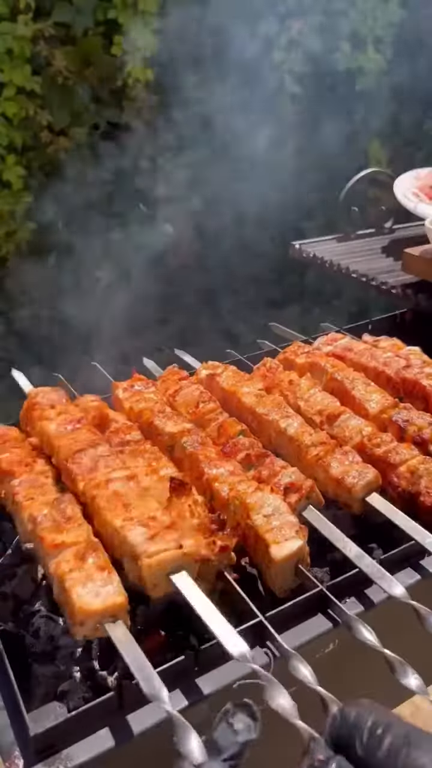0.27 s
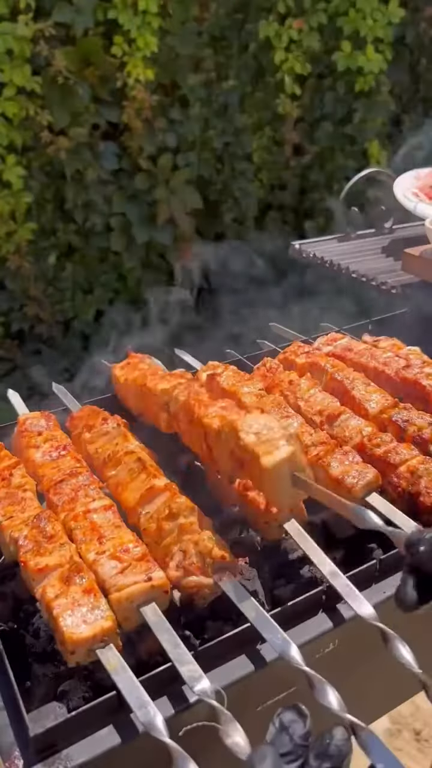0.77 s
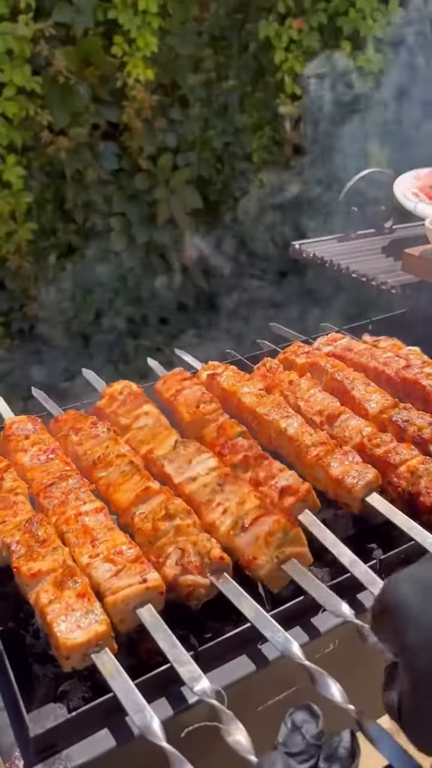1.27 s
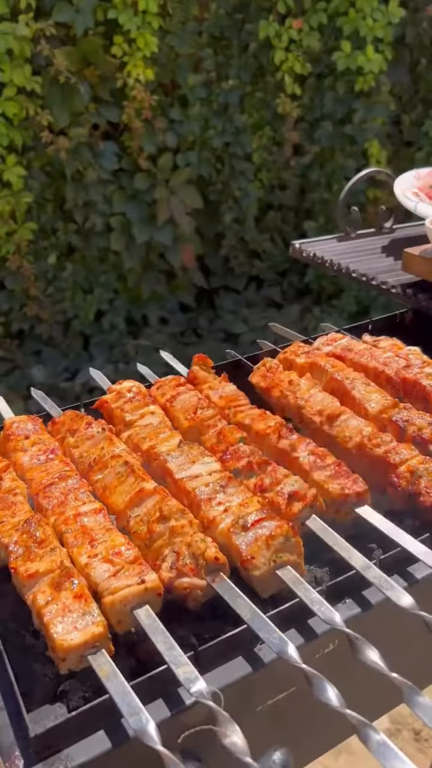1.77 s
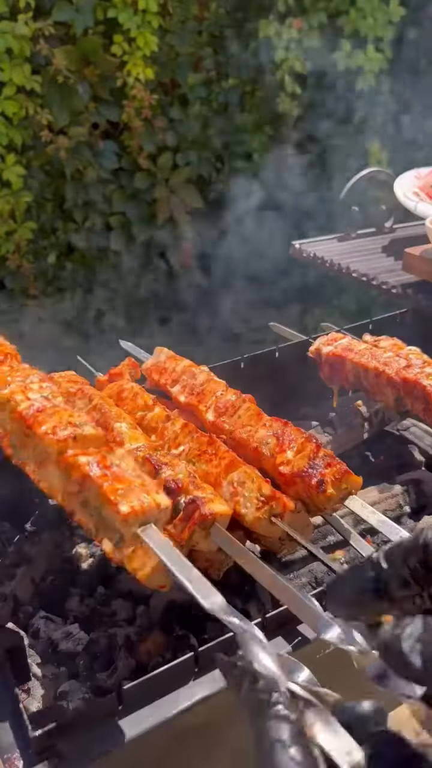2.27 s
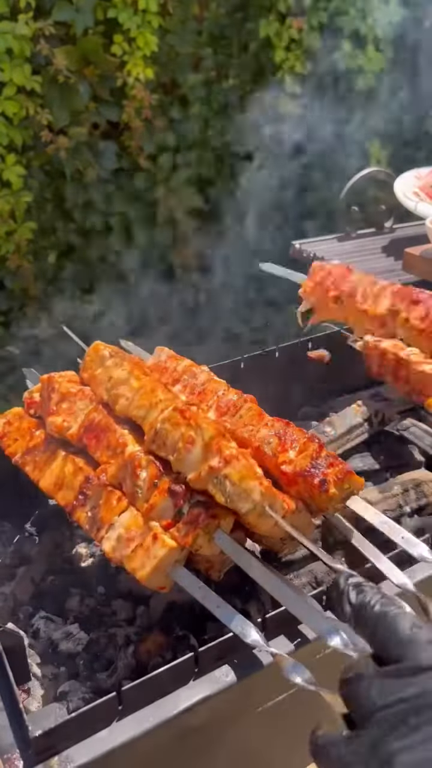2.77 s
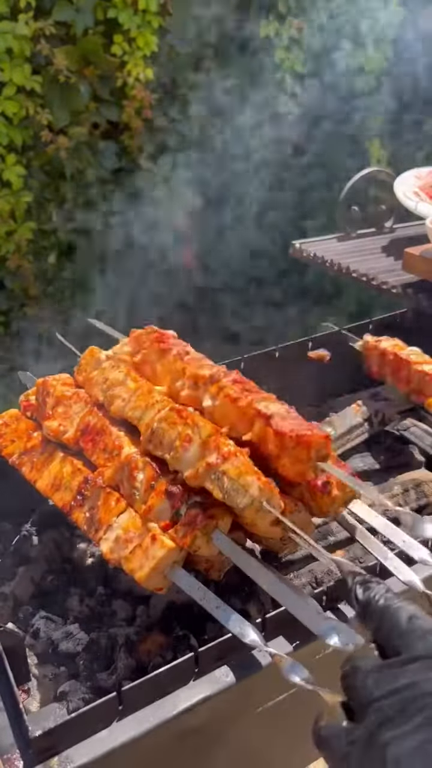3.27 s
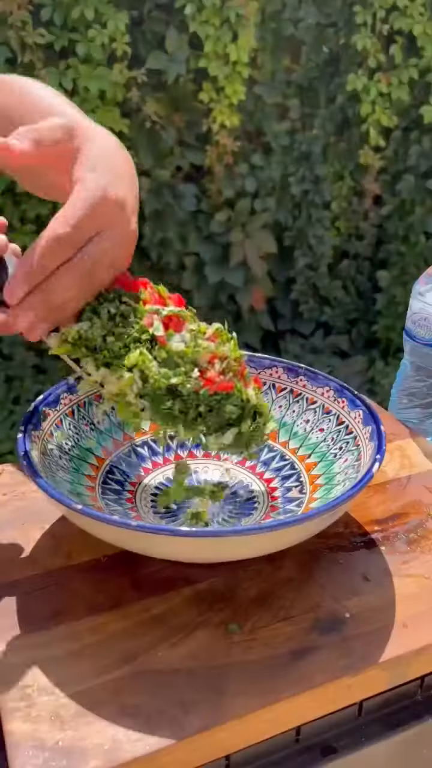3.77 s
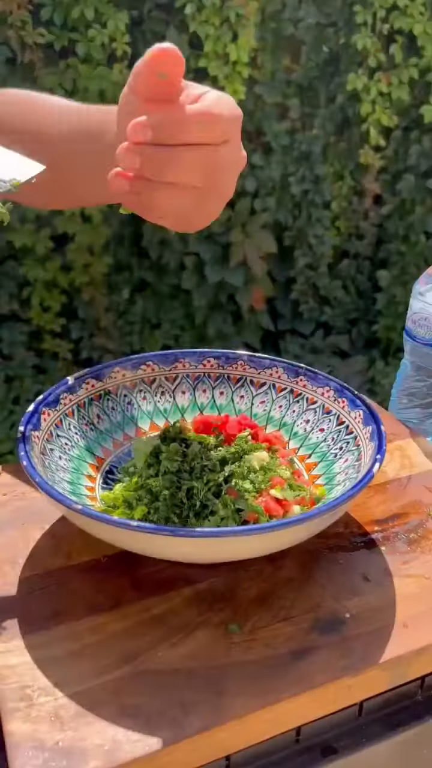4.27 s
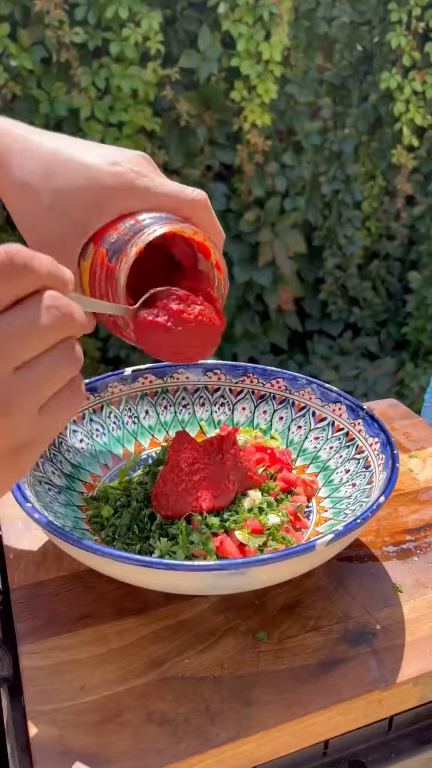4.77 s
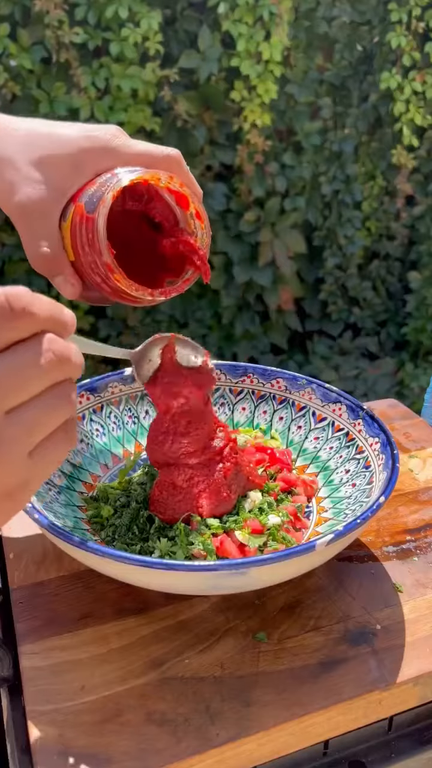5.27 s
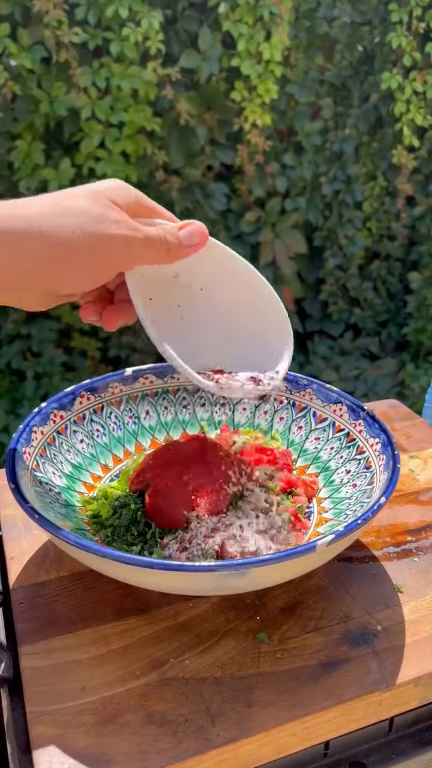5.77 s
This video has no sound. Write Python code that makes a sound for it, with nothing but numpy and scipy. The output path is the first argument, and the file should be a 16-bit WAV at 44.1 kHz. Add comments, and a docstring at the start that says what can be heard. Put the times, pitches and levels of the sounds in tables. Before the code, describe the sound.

In a garden, with a light breeze rumbling on the microphone, meat hisses and crackles as metal skewers clank, rattle and rub on a steel grill close by. A little past halfway, the sound changes to gentle food preparation. Herbs slide off a cleaver and patter into a bowl, the blade rings against a board, a spoon clinks on a jar and releases wet paste, and salt crystals tick off a saucer.

```python
"""Outdoors, steel skewers drop and slide onto the rim of a sheet-steel charcoal grill, which clunks,
rings and drones while meat sizzles and fat spits. From about 3.4 seconds we are at a wooden table.
Chopped herbs rustle off a cleaver into a bowl, then the cleaver knocks on the board and rings.
Next a spoon taps a jar and scoops out sticky paste. Last, coarse salt trickles from a saucer,
ticking as it goes. A soft garden hush and a low breeze lie under it all."""
import sys
import numpy as np
from scipy import signal
from scipy.fft import rfft, irfft, next_fast_len
from scipy.io import wavfile
from scipy.ndimage import uniform_filter1d

SR = 44100
rng = np.random.default_rng(int(sys.argv[2]) if len(sys.argv) > 2 else 0)


def unload_wav(signal):
    """Save mono or channel-first audio to the path in sys.argv[1] as 16-bit WAV at rate SR, clipped to [-1, 1]."""
    wavfile.write(
        sys.argv[1],
        SR,
        np.round(np.clip(np.atleast_2d(signal).T, -1, 1) * 32767).astype(np.int16),
    )


N = 265482
TIME = np.arange(N) / SR
RING_TIME = TIME[:SR // 2]

# The tones of the grill's steel box and of the cleaver's blade.
# Each row: pitch in Hz, level in dB, ring time in seconds (the time to fade by 60 dB).
GRILL_TONES = [(237, 7.5, 0.11), (263.5, -4.5, 0.24), (299.5, -7.5, 0.51), (339, -4.5, 0.18),
               (371, -3.5, .28), (580, -6.5, 0.18), (665, -8, 0.058), (716, 1.5, 0.072), (746, 3, 0.19),
               (832, -11.5, 0.47), (984, -4.5, 0.18), (1062.1, -5.5, 0.37), (1220, 2.5, 0.25),
               (1334, -1, 0.23), (1443, -2, 0.25), (1819, -7.5, 0.074), (1780, -10, 0.6), (2241, 0.5, .2),
               (2486, -3.5, .18), (2990, -2, 0.3), (3050, -5, 0.17), (3940, -3, 0.22), (4150, 1.5, .15),
               (5250, -5.5, .1), (5954, -4.5, 0.12), (7200, -5, 0.13), (7680, -4, .14), (10700, -0.5, .12)]
BLADE_TONES = [(843, -3.5, 0.16), (905, -5, 0.21), (2116, 4, 0.11), (2200, 8.5, 0.046), (2520, 5, 0.076),
               (2690, 0.5, 0.13), (2940, -3, 0.073), (3370, 1, 0.035), (4230, -8, 0.12), (4850, -5, 0.11),
               (7710, -17.5, 0.093), (7940, -9.5, 0.064)]
# Stretches of steady background. Each row: start in seconds, then in dB the meat's hiss, its fizz,
# the far hush, the hiss of leaves, and a brief change of level at the start (below zero is a dip).
STAGES = [(0, -55.5, -53.5, -54.5, -80, -1), (.149, -56.5, -54, -56.5, -76.5, -14),
          (.696, -54, -54, -58.5, -70, -13), (1.394, -61.5, -60.5, -59, -70, -12),
          (2.099, -59.5, -56, -69, -87, -5.5), (2.772, -53, -49.5, -61.5, -84, -11),
          (3.407, -91.5, -75.5, -65.5, -67.5, -2), (4.38, -86.5, -82, -63.5, -71, 4),
          (5.04, -87, -81, -66, -80, 0), (5.403, -81, -74, -62.5, -70.5, -10)]


def rim_blows():
    """List every blow on the rim, adding a skewer that rocks to rest with ever sooner, softer touches."""
    # Each row: start in seconds, clunk level in dB, clunk pitch in Hz, ring level in dB,
    # brightness in dB per octave, length of the chatter in seconds.
    blows = [(.057, -45, 434, -53.5, 1.5, .003), (.243, -28, 348, -29.5, 1, 0.0031),
             (.25, -22, 341, -46.5, -2.5, 0.015), (.3612, -41, 860, -39.5, 1.5, 0.0011),
             (.385, -32.5, 320, -35, -1.5, 0.021), (.403, -35, 870, -44, -2.5, .008),
             (.4229, -22, 345, -28, 0.7, 0.0037), (.433, -23.5, 295.2, -38.5, -4, 0.0029),
             (.522, -36, 318.4, -49.5, -1.5, .0046), (.635, -38.5, 310, -71, -2, .0036),
             (.682, -49.5, 486, -57.5, -2.5, .006), (.776, -48, 293, -52.5, -0.5, .006),
             (.812, -19.5, 717, -27.5, -0.64, 0.00085), (.961, -37, 304, -38.5, -4.5, .015),
             (.995, -38.5, 526, -47, -5.5, .017), (1.115, -38.5, 284, -54, -3.5, 0.058),
             (1.155, -48.5, 893, -51, -4, .03), (1.268, -38, 297, -39, -2, 0.0051),
             (1.333, -45.5, 734, -54, -3, 0.0058), (1.635, -19.5, 261, -24, 0.47, 0.0026),
             (1.6472, -18, 260.4, -27.5, -3.5, 0.003), (1.7489, -21.5, 288, -29.5, -.2, 0.0034),
             (2.107, -43, 299, -66.5, -5, .0063), (2.5429, -60.5, 290, -49, 2.5, .021),
             (2.593, -56.5, 290, -48, 3, 0.0055), (2.718, -41, 275, -57.5, 0, .0053),
             (3.055, -43, 350, -38, -3, 0.017), (3.072, -37, 350, -40.5, -4, 0.014),
             (3.152, -38, 308.1, -63, -8, 0.024), (3.171, -33, 297, -50, -7.5, 0.0061),
             (3.337, -42.5, 313, -57.5, -3, 0.0022)]
    first_gap_s, gap_shrink, loss_db = .084, .84, 8.5
    times = 1.846 + np.cumsum(np.r_[0, first_gap_s * gap_shrink ** np.arange(3)])
    rocking = [(s, -32 - k * loss_db, 304.52, -55.5 - k * loss_db, -6, .0034)
               for k, s in enumerate(times)]
    return list(blows) + rocking


def grill_clunks():
    """Each blow swings the grill's wall a few times in a hollow clunk; its lowest tones hum on softly."""
    out = np.zeros((2, N))
    low_tones = [tone for tone in GRILL_TONES if tone[0] < 450]
    for s, clunk_db, hz, _, _, length in rim_blows():
        age = RING_TIME / (2.14 / hz + .16 * length)   # a longer contact draws the swing out
        wave = np.sin(2 * np.pi * (hz * RING_TIME + rng.random((2, 1))))
        swing = rms_one((age * np.exp(-age)) ** 2.6 * wave)
        hum = rms_one(ringing(low_tones) * onset(.02))
        hum_gain = from_db(-8.5) * min(300 / hz, 1) ** 2   # clunks above 300 Hz leave less hum
        add_blow(out, s, clunk_db, chatter(length, per_s=1400, bounce=.044), swing + hum_gain * hum)
    return out


def skewer_rings():
    """Skewers chatter on the rim; the box answers with clear tones in a noisy wash."""
    # The wash of the steel. Each row: frequency in Hz, level in dB.
    steel_colour = [(300, -16.5), (480, -16), (580, -4), (720, -0.5), (830, 0.5), (1000, -3), (2400, -8.5),
                    (2700, -5), (4000, -3.5), (6500, -7), (9000, -9), (11000, -12.5), (12500, -15),
                    (15000, -12.5)]
    # Clang, rattle, clink and crack. Each row: low and high edge in Hz, then build-up, early ring time
    # and tail ring time in seconds, then tail level and level of the clear tones in dB.
    registers = [(567, 1000, 0.0014, 0.022, 0.25, -23, 0), (1110.6, 2300, 0.00027, 0.048, 0.18, -9, -5.5),
                 (2787, 6500, 0.0005, 0.096, .22, -14, -9), (6560, 13000, 0.00018, 0.074, 0.22, -18.5, -10)]
    out, blows = np.zeros((2, N)), rim_blows()
    steel_noise = coloured(rng.standard_normal((2, N)), steel_colour)
    forces = [chatter(blow[-1], per_s=2700, bounce=.3) for blow in blows]
    for low_hz, high_hz, build_up, early_s, tail_s, tail_db, tones_db in registers:
        octaves = np.log2(np.sqrt(low_hz * high_hz) / 2700)   # brightness tilts around 2700 Hz
        swell = 1 - np.exp(-(RING_TIME / build_up) ** 2)
        dying = fade(early_s) + from_db(tail_db) * fade(tail_s)
        settling = fade(early_s) + from_db(-11.5)   # the skewer lying on the rim damps the first swing
        dense = band(steel_noise, low_hz, high_hz)
        tones = [tone for tone in GRILL_TONES if .95 * low_hz < tone[0] < high_hz]
        clear = rms_one(ringing(tones) * settling * swell)
        for (s, _, _, ring_db, brightness, _), force in zip(blows, forces):
            spot = dense[:, int(s * SR):][:, :len(RING_TIME)]   # every spot stirs other tones
            wash = rms_one(spot * dying * swell)
            add_blow(out, s, ring_db + brightness * octaves, force, wash + from_db(tones_db) * clear)
    return out


def skewer_drone():
    """Skewers rub on the rim in tiny slips that keep the box's lowest tones going."""
    # Each row: start in seconds, hold in seconds, level in dB.
    rubs = [(.25, 1.13, -43.5), (1.45, 0.64, -48), (2.6, 0.018, -51), (3.11, 0.13, -41.5)]
    # Each row: frequency in Hz, level in dB.
    scrape_colour = [(130, -6), (230, 0), (380, 2.5), (520, -9.5), (850, -11), (2000, -24.5),
                     (5000, -30), (12000, -46)]
    slips = grains(per_s=900, spread_db=3)
    hum = rms_one(band(excite(slips, ringing(GRILL_TONES)), 220, 430))
    scrape = coloured(slips, scrape_colour)
    return swells(rubs, rise=360, fall=210) * (from_db(-8) * hum + from_db(-2) * scrape)


def cleaver_and_spoon():
    """The cleaver cracks and rings as the board thumps under it; then the spoon taps the jar."""
    # Each row: start in seconds, levels of ring, crack and thump in dB, contact length in seconds.
    knocks = [(4.293, -47, -54, -71, 0.0024), (4.3064, -35.5, -50.5, -52, 0.0024),
              (4.975, -74.5, -67.5, -87, 0.00082)]
    # Each row: start in seconds, level in dB, contact length in seconds.
    spoon_taps = [(4.700, -53, 0.0059), (4.712, -52, 0.0059), (4.738, -58, 0.03)]
    # The tones of the board and the jar. Each row: pitch in Hz, level in dB, ring time in seconds.
    board_tones = [(66.43, 9, 0.2), (105, -16.5, 0.074)]
    jar_tones = [(804, 1, 0.072), (2050, -2, 0.035), (2270, -7, 0.027), (2540, -8, 0.11),
                 (2540, 2.5, 0.053), (3090, -16, .06), (4170, -9, 0.048), (4700, -6.5, 0.038),
                 (7860, -20.5, .04)]
    # The crack at the contact. Each row: frequency in Hz, level in dB.
    crack_colour = [(800, -10), (2200, 4), (4500, -6.5), (6000, -6), (8000, -2), (10000, -25),
                    (15000, -32.5)]
    out = np.zeros((2, N))
    blade = ringing(BLADE_TONES) * (fade(.056) + from_db(-15))   # the hand soaks up the first ring
    board = ringing(board_tones) * onset(.0028)
    crack = coloured(short_noise(), crack_colour) * (fade(.012) + from_db(-9) * fade(.19))
    for s, ring_db, crack_db, thump_db, length in knocks:
        force = chatter(length, per_s=4400, bounce=.161)
        add_blow(out, s, ring_db, force, blade)
        add_blow(out, s, crack_db, force, crack)
        add_blow(out, s, thump_db, force, board)
    for s, level_db, length in spoon_taps:
        force = chatter(length, per_s=2000, bounce=.14)
        add_blow(out, s, level_db, force, ringing(jar_tones) * onset(.0012))   # paste cushions the touch
        add_blow(out, s, level_db - 6, chatter(length, per_s=5000, bounce=.94), crack)
    return out


def salt():
    """Crystals tick over the saucer in streams and small clumps; strays tick into the bowl."""
    # The saucer's tones. Each row: pitch in Hz, level in dB, ring time in seconds when not held.
    saucer_tones = [(4180, -12.5, 0.38), (5820, -5.5, 0.26), (7100, -3.5, 3.4), (8170, -2.5, 0.28),
                    (10070, -1.5, 5.0), (10200, -13, 0.67), (11508, -3, 0.176), (12200, -17, 0.52),
                    (13610, -16, 0.2), (14230, -22, 0.096)]
    # The ticks of the crystals. Each row: frequency in Hz, level in dB.
    salt_colour = [(1500, -15), (4000, -10), (6000, 3.5), (9000, -6), (12000, 7), (13500, -12),
                   (15500, -15.5)]
    # Each row: start in seconds, hold in seconds, level in dB.
    streams = [(5.435, 0.016, -69), (5.53, 0.1045, -56), (5.72, 0.035, -66)]
    # Clumps breaking loose, and stray crystals. Each row: start in seconds, rough peak level in dB.
    clumps = [(5.4357, -57.5), (5.4857, -51), (5.5438, -35.5), (5.5594, -34), (5.5937, -38),
              (5.6506, -39.5), (5.7833, -52), (5.8366, -52.5), (5.9184, -57)]
    strays = [(5.4205, -48), (5.4362, -46), (5.4725, -51), (5.5156, -46), (5.544, -47), (5.8339, -63),
              (5.9343, -49), (5.947, -47)]
    ticks = grains(per_s=1700, spread_db=2.6) * flutter(per_s=220, depth_db=2.5)
    ring = rms_one(excite(ticks, ringing(saucer_tones) * fade(.14)))   # the hand keeps the ring short
    hold_s, peak_above_average_db = .0073, 10
    clump_rows = [(s, hold_s, peak_db - peak_above_average_db) for s, peak_db in clumps]
    flow = np.hypot(swells(streams, rise=350, fall=180), swells(clump_rows, rise=4000, fall=740))
    out = flow * (from_db(-2) * ring + from_db(-4.5) * coloured(ticks, salt_colour))
    for s, peak_db in strays:
        start = int(s * SR)
        tick = band(short_noise() * np.exp(-RING_TIME / .00188), 1570, 5620)[:, :N - start]
        out[:, start:start + tick.shape[1]] += from_db(peak_db) * tick / np.abs(tick).max()
    return out


def herbs():
    """Leaves rustle over the blade in tufts, ringing it faintly, and patter softly into the bowl."""
    # Pushes over the blade, and heaps landing. Each row: start in seconds, hold in seconds, level in dB.
    pushes = [(3.8, .02, -56.5), (3.92, 0.0156, -54)]
    heaps = [(3.55, 0.049, -52.5), (3.78, 0.22, -60)]
    # Each row: frequency in Hz, level in dB.
    rustle_colour = [(1200, -4), (2200, -8), (4800, -1), (7000, 1), (9000, -2), (11500, -0.5),
                     (13500, -9.5), (15500, -17.5)]
    patter_colour = [(120, -5), (300, -5.5), (550, -3.5), (900, -7), (2000, -22.5), (5000, -39)]
    leaves = grains(per_s=5000, spread_db=2.6) * flutter(per_s=130, depth_db=2.4)
    landing = grains(per_s=2500, spread_db=1.5) * flutter(per_s=70, depth_db=2.2)
    blade = rms_one(band(excite(leaves, ringing(BLADE_TONES)), 3300, 9000))
    rustle = coloured(leaves, rustle_colour) + from_db(-8.5) * blade
    patter = coloured(landing, patter_colour)
    return swells(pushes, rise=99, fall=110) * rustle + swells(heaps, rise=240, fall=64) * patter


def paste():
    """Wet paste tears in many small smacks as it leaves the spoon."""
    # Each row: start in seconds, hold in seconds, level in dB.
    tears = [(4.855, 0.0565, -54), (5.007, .006, -54)]
    # Each row: frequency in Hz, level in dB.
    smack_colour = [(500, -43), (800, 1), (1050, 6.5), (1500, 0.5), (2500, -11), (5000, -19.5),
                    (10000, -20), (15000, -47)]
    smacks = grains(per_s=5000, spread_db=.5)
    return swells(tears, rise=520, fall=680) * coloured(smacks, smack_colour)


def sizzle():
    """Meat gives off thousands of tiny steam bursts a second, with crackle, flares and spits of fat."""
    # Each row: frequency in Hz, level in dB.
    steam_colour = [(800, -23), (1100, -5), (1700, -2.5), (2150, -0.5), (2800, -1.5), (4000, 1.5),
                    (6000, 1), (10000, 0), (12000, -8.5), (15500, -5.5)]
    # Meat laid on fresh heat fizzes up. Each row: start in seconds, hold in seconds, level in dB.
    flares = [(.48, 0.12, -51), (.8, .15, -51.5)]
    # Fat spitting on the coals. Each row: start in seconds, level in dB.
    spits = [(0.7198, -50.5), (0.7672, -57), (2.2387, -59), (2.3441, -53.5), (2.4433, -61.5),
             (2.5287, -58.5), (2.7162, -56), (2.7598, -38), (2.7856, -59), (2.8843, -50), (2.9632, -54.5),
             (3.0305, -53.5)]
    surge = flutter(per_s=14, depth_db=1.1)
    crackle = .45 * grains(per_s=260, spread_db=2.2) * flutter(per_s=35, depth_db=3)
    bursts = coloured(grains(per_s=12000, spread_db=0) + crackle, steam_colour)
    hiss = stage_gain("hiss") * rms_one(band(bursts, 1000, 6500))
    fizz = stage_gain("fizz") * rms_one(band(bursts, 5200, 20000))
    flare = coloured(grains(per_s=14000, spread_db=0), steam_colour)
    bright_flare = rms_one(band(flare, 9500, 12500) + from_db(-7.5) * flare)
    out = surge * (hiss + fizz) + swells(flares, rise=120, fall=70) * bright_flare
    for s, level_db in spits:
        snap = band(short_noise() * np.exp(-(RING_TIME / .0041) ** 2), 1170, 9200)
        add_blow(out, s, level_db, np.array([1, -.6]), snap)   # the burst pushes out, then falls back
    return out


def garden():
    """A far hush, a hiss of leaves, and a low, uneven breeze on the microphone with a few gusts."""
    # Each row: time in seconds, relative strength in dB.
    breeze_curve = [(0.0, -58.5), (0.48, -53), (1.12, -61.5), (1.76, -50.5), (2.4, -77), (3.37, -68.5),
                    (3.64, -77), (5.45, -77.5), (5.58, -64.5), (6.02, -72)]
    # Each row: start in seconds, hold in seconds, level in dB.
    gusts = [(1.495, .025, -37), (1.88, .025, -42.5)]
    # Each row: frequency in Hz, level in dB.
    hush_colour = [(110, -11), (200, -1.5), (340, 0), (520, -4.5), (800, -8.5), (1300, -9), (1470, -9),
                   (1590, -4.5), (1730, -7), (2150, -7.5), (2600, -15), (4000, -28.5), (9000, -45.5),
                   (15000, -57.5)]
    leaf_colour = [(1500, -11.5), (2200, 3.5), (3500, 1.5), (5000, 0), (7000, -8.5), (10000, -24.5),
                   (13000, -25.5), (15500, -29.5)]
    breeze_colour = [(30, -18.5), (42, -11), (60, 3.5), (90, -3.5), (150, -4), (220, -22), (400, -57)]
    strength = from_db(5.5 + np.interp(TIME, *np.transpose(breeze_curve)))
    breeze = strength * flutter(per_s=9.7, depth_db=3.5) + swells(gusts, rise=700, fall=880)
    layers = [(stage_gain("hush"), hush_colour), (stage_gain("leaves"), leaf_colour),
              (breeze, breeze_colour)]
    return sum(gain * coloured(rng.standard_normal((2, N)), colour) for gain, colour in layers)


def left_and_right(paths):
    """Direct sound reaches two microphone openings alike; scattered sound pushes one, pulls the other."""
    # Each row: frequency in Hz, likeness of the sides from 0 to 1, left over right in dB,
    # how far the left wave runs ahead in radians.
    openings = [(60, 0.76, -0.5, 0), (150, 1, 1.5, 0.91), (336, 0.94, -0.86, 0.42), (500, 0.92, 5, -0.11),
                (780, 0.32, 3.5, -1.1), (1140, 0.92, -1, -0.66), (2180, 1, 0, -0.82), (4500, .6, -0.5, 0.1),
                (8000, 0.52, 0, -.85), (14000, .55, -0.24, -0.26)]
    size = next_fast_len(N + SR // 10)
    alike, balance_db, lead = at_hz(openings, np.arange(size // 2 + 1) * SR / size)
    direct, scattered = rfft(paths, size) * np.sqrt([(1 + alike) / 2, (1 - alike) / 2])
    lean = from_db(balance_db / 2) * np.exp(1j * lead / 2)
    return irfft(np.array([(direct + scattered) * lean, (direct - scattered) / lean]), size)[:, :N]


def from_db(db):
    """Turn decibels into a gain, a number to multiply by."""
    return 10 ** (np.asarray(db) / 20)


def rms_one(x):
    """Scale a sound so that its average level (rms) is 1."""
    return x / np.sqrt(np.mean(x ** 2) + 1e-20)


def fade(ring_s):
    """A gain that falls by 60 dB every ring_s seconds."""
    return from_db(-60 * RING_TIME / ring_s)


def onset(rise_s):
    """A gain that climbs from 0 towards 1, softening a start."""
    return 1 - np.exp(-RING_TIME / rise_s)


def short_noise():
    """Two streams of plain noise, half a second long."""
    return rng.standard_normal((2, len(RING_TIME)))


def at_hz(rows, hz):
    """Read a table between its rows, giving each octave equal room."""
    points, *columns = np.transpose(rows)
    return [np.interp(np.log(hz + 1), np.log(points), column) for column in columns]


def band(x, low_hz, high_hz):
    """Keep the part of a sound between two frequencies."""
    sections = signal.butter(3, [low_hz, min(high_hz, .45 * SR)], "band", fs=SR, output="sos")
    return signal.sosfilt(sections, x + 1e-18)


def coloured(x, colour):
    """Give a sound a colour, its balance of lows and highs; it falls away below the first row."""
    size = next_fast_len(x.shape[-1])
    hz = np.arange(size // 2 + 1) * SR / size
    shape = from_db(at_hz(colour, hz)[0]) * np.minimum(hz / colour[0][0], 1) ** 2
    return rms_one(irfft(rfft(x, size) * shape, size)[..., :x.shape[-1]])


def grains(per_s, spread_db):
    """Two streams of random clicks of uneven size."""
    born = rng.random(N) < per_s / SR
    sizes = from_db(spread_db * np.minimum(rng.exponential(1, N), 4.5))
    return rms_one(born * sizes * rng.standard_normal((2, N)))


def ringing(tones):
    """The fading tones of a struck object, along a direct and a scattered path."""
    waves = (from_db(db) * fade(ring_s) * np.sin(2 * np.pi * (hz * RING_TIME + rng.random((2, 1))))
             for hz, db, ring_s in tones)
    return rms_one(sum(waves))


def excite(clicks, ring):
    """Let every click set off the same ring."""
    return signal.fftconvolve(clicks, ring, axes=1)[:, :N]


def chatter(length, per_s, bounce):
    """The force of a blow: a first touch and a hail of bounces that dies away."""
    t = TIME[:int(5 * length * SR) + 2]
    touching = rng.random(len(t)) < per_s / SR
    force = bounce * touching * rng.standard_normal(len(t)) * np.exp(-t / (1.3 * length))
    force[0] = 1
    return force


def add_blow(out, s, level_db, force, response):
    """Add a blow at s seconds; level_db sets the average level of its first 40 ms."""
    start = int(s * SR)
    sound = signal.fftconvolve(response, force[None], axes=1)[:, :N - start]
    level = np.sqrt(np.mean(sound[:, :SR // 25] ** 2, axis=1, keepdims=True))
    out[:, start:start + sound.shape[1]] += from_db(level_db) * sound / level


def flutter(per_s, depth_db):
    """A gain that wanders up and down at random."""
    knots = rng.standard_normal(N // 40)
    return from_db(depth_db * np.interp(TIME * per_s, np.arange(len(knots)), knots))


def swells(rows, rise, fall):
    """A gain that rises up to each row's start, holds, then falls; rise and fall are in dB per second."""
    power = 0
    for s, hold, db in rows:
        level_db = db - rise * np.maximum(s - TIME, 0) - fall * np.maximum(TIME - s - hold, 0)
        power += from_db(np.maximum(level_db, -200)) ** 2
    return np.sqrt(power)


def stage_gain(layer):
    """The gain of one background layer, steady within each stage and blended over 12 ms."""
    stages = np.array(STAGES)
    column = ["hiss", "fizz", "hush", "leaves"].index(layer) + 1
    now = np.maximum(np.searchsorted(stages[:, 0], TIME, side="right") - 1, 0)
    return uniform_filter1d(from_db(stages[now, column]), int(.012 * SR))


def scene():
    """Grill first, then the table, in the same garden; the level dips briefly as most stages start."""
    dips = from_db(sum(db * np.exp(-((TIME - s) / .0077) ** 2) for s, *_, db in STAGES))
    grill = grill_clunks() + skewer_rings() + skewer_drone() + sizzle()
    table = herbs() + cleaver_and_spoon() + paste() + salt()
    return dips * left_and_right(grill + table + garden())


def record(dry):
    """Round off the highest peaks and cut the treble above 15700 Hz."""
    rounded = .95 * np.tanh(dry / .95)
    return signal.sosfilt(signal.ellip(10, .2, 70, 15700, fs=SR, output="sos"), rounded)


dry = scene()
out = record(dry)
unload_wav(out)
```